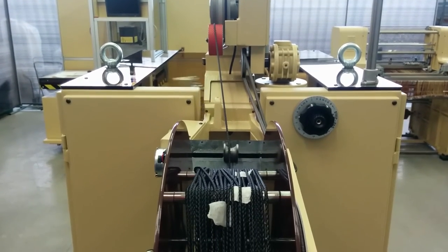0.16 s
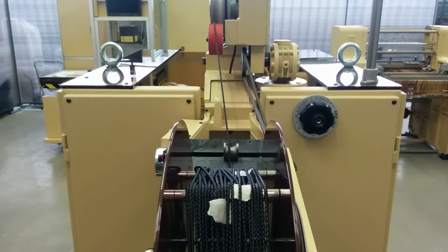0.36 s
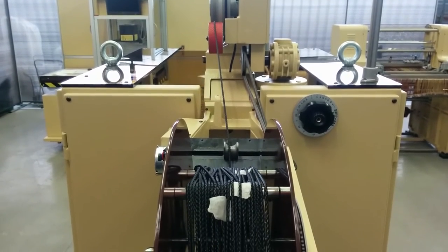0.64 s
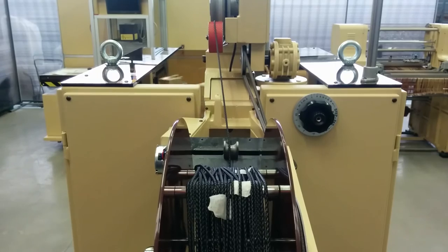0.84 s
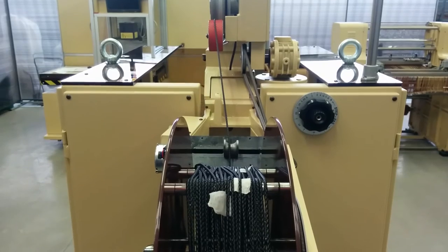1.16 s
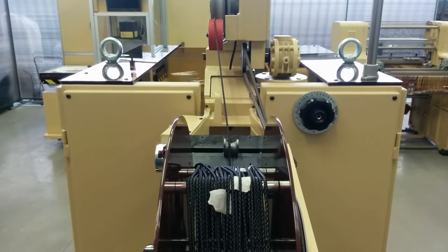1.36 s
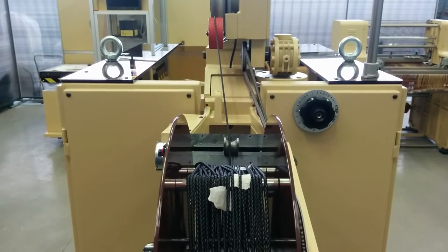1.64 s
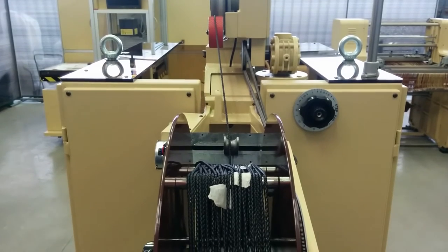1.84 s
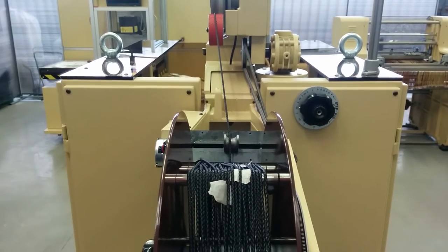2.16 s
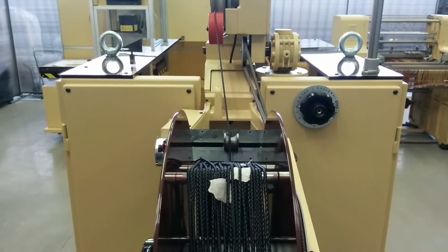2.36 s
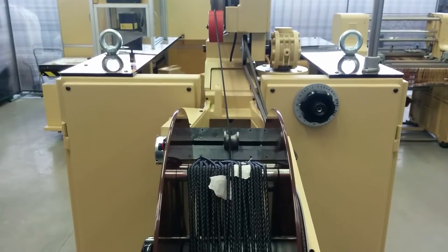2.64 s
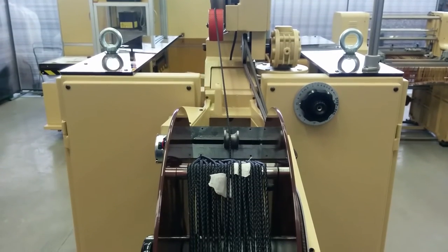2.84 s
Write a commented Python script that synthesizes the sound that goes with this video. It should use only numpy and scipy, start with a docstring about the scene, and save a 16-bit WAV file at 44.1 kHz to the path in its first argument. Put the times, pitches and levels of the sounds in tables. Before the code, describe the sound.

A braiding machine clatters continuously for about 3 seconds, already running at the start and cut off while running. Some twenty uneven hollow knocks per second mix with dry steel clacks, bright tinkles and short plate rings. Accents grow brighter around 0.7-1.3, with strong metallic bursts near 2.2, 2.5 and 2.8. Underneath lie steady low motor rumble, fine loose rattle and faint thin whine; short workshop reverberation.

```python
"""Braiding machine in a workshop

A braiding machine runs: its bobbin carriers knock through the track of a hollow frame, steel levers
clack and tinkle, and jolted plates and spindles ring. Each blow is a force of impulses and noise bursts
filtered by the modes of the struck part, with a longer noise tail as the answer of the hall.
Beneath lie a rattle of decaying sines, the motor's rumble of coloured noise and two thin whining tones."""
import sys
import numpy as np
from scipy.fft import rfft, irfft, next_fast_len
from scipy.io import wavfile
from scipy.ndimage import uniform_filter1d, map_coordinates

SR = 44100
rng = np.random.default_rng(int(sys.argv[2]) if len(sys.argv) > 2 else 0)


def transcribe(u):
    """Save the signal u as a 16-bit wav file named by the first command-line argument.

    u: samples, shape (n,) or (channels, n), limited to [-1, 1]; the rate is SR.
    q: integer samples, one column per channel.
    """
    v = np.clip(np.atleast_2d(u).T, -1, 1)
    q = np.round(v * 32767).astype(np.int16)
    wavfile.write(sys.argv[1], SR, q)


N = 132741  # length [samples]

# time and frequency axes of a single blow
BLOW_SIZE = 24576  # [samples]
AGE = np.arange(BLOW_SIZE) / SR  # [s]
BLOW_HZ = np.fft.rfftfreq(BLOW_SIZE, 1 / SR)


def amp(db):
    """Level as a logarithm of amplitude: decibels to a linear gain."""
    return 10 ** (np.asarray(db) / 20)


def unit(x):
    """Normalisation by effective value: scale to rms 1."""
    return x / np.sqrt(np.mean(x ** 2) + 1e-20)


def along(points, hz):
    """Logarithmic pitch scale: interpolate (frequency [Hz], value) points evenly in log frequency."""
    point_hz, values = np.transpose(points)
    return np.interp(np.log(hz + 1), np.log(point_hz + 1), values)


def filtered(x, response):
    """Linear filtering: convolution in time is multiplication by a response in frequency."""
    size = next_fast_len(N + SR // 2)
    spectrum = rfft(x, size) * response(np.fft.rfftfreq(size, 1 / SR))
    return irfft(spectrum, size)[:N]


def wobble(rate):
    """Band-limited fluctuation: a smooth curve through random knots, rate of them a second."""
    knots = rng.standard_normal(int(N * rate / SR) + 4)
    return map_coordinates(knots, [np.arange(N) * rate / SR])


def motor():
    """Broadband and tonal machine noise: steady coloured rumble and the drive's slightly wavering whine."""
    # whine of the drive: (frequency [Hz], rms level before the waver [dB])
    whine_lines = [(4150, -60), (7950, -59.5)]
    # colour of the rumble: (frequency [Hz], relative level [dB])
    rumble_colour = [(25, -33), (90, 7), (300, 5.5), (450, 4.5), (900, 4.5), (1150, -19.5), (2000, -26),
                     (2600, -30), (4200, -37), (4800, -47), (7900, -49), (15500, -95)]
    rumble_db = -39.5  # rms level
    waver_db, waver_rad, wavers_per_s = 3.5, 1.1, 55  # scale of level and phase wander, knot rate

    t = np.arange(N) / SR
    whine = np.zeros(N)
    for hz, db in whine_lines:
        level = amp(db + waver_db * wobble(wavers_per_s))
        phase = 2 * np.pi * hz * t + waver_rad * wobble(wavers_per_s)
        whine += level * np.sqrt(2) * np.sin(phase)
    rumble = filtered(rng.standard_normal(N), lambda hz: amp(along(rumble_colour, hz)))
    return whine + amp(rumble_db) * unit(rumble)


def add(track, s, sound):
    """Superposition: mix a sound into the track at time s [s]."""
    start = max(round(s * SR), 0)
    track[start:start + len(sound)] += sound[:max(N - start, 0)]


def rattle(tick_t60=0.076, size=4000):
    """Free decay of small oscillators: loose parts tick at random, each ringing briefly at its own pitch."""
    # colour of the whole rattle: (frequency [Hz], relative level [dB])
    rattle_colour = [(250, -4.5), (900, 0.5), (1150, -1), (2600, -0.5), (4000, -30.5)]
    rattle_db, ticks_per_s = -43.5, 220  # rms level of the whole; tick rate
    spread_db = 3  # scale of the exponential spread of tick levels
    low, high = 292.7, 3620  # range of pitches [Hz]

    track = np.zeros(N)
    t = AGE[:size]
    for when, strength, pitch in rng.random((int(ticks_per_s * N / SR), 3)):
        db = -spread_db * np.log(1 - .97 * strength) - 60 * t / tick_t60
        hz = low * (high / low) ** pitch
        add(track, when * N / SR, amp(db) * np.sin(2 * np.pi * hz * t))
    return amp(rattle_db) * unit(filtered(track, lambda hz: amp(along(rattle_colour, hz))))


def colour(points):
    """Minimum phase: folding the cepstrum onto positive time gives a causal response of given colour."""
    cepstrum = irfft(np.log(amp(along(points, BLOW_HZ))))
    cepstrum[1:BLOW_SIZE // 2] *= 2
    cepstrum[BLOW_SIZE // 2 + 1:] = 0
    return np.exp(rfft(cepstrum))


def resonances(modes):
    """Modal superposition: a sum of damped second-order resonators with alternating signs."""
    f = BLOW_HZ
    response = 0
    for k, (centre, width, db) in enumerate(modes):
        damping = 1j * f * width
        response = response + (-1) ** k * amp(db) * damping / (centre * centre - f * f + damping)
    return response


def varied(body):
    """Dependence on the point of impact: from blow to blow the modes shift and change in strength."""
    tint_db, tint_hz = 4, 110.5  # depth and spacing of the random change in colour
    detune = 0.004  # rms relative shift in pitch

    place = BLOW_HZ / tint_hz
    knots = rng.standard_normal(int(place[-1]) + 2)
    tint = colour(np.column_stack([BLOW_HZ, tint_db * map_coordinates(knots, [place])]))
    shifted_hz = BLOW_HZ * (1 + detune * rng.standard_normal())
    return tint * np.interp(shifted_hz, BLOW_HZ, body)


def rebounds(first_s, count=3):
    """Inelastic collision: a hard contact and its weaker rebounds, as impulses at uneven gaps."""
    bounce_s, loss_db = .009, 2.5  # a flight lasts 0.5 to 2 times bounce_s; loss at each rebound
    flights = bounce_s * rng.uniform(.5, 2, count)
    at = (first_s + np.cumsum(flights) - flights[0]) * SR
    return np.bincount(at.astype(int), amp(-loss_db * np.arange(count)), BLOW_SIZE)


def strike(times, levels, body, gain_db, slap_db, attack_s, chatter_t60, hall_db, hall_t60, size=900):
    """Source and filter: hard contacts, a swelling, dying chatter and its hall echo excite one body."""
    lead_s = .003  # the parts graze this long before the nominal time of the blow
    grain_db, flutter_db = 2, 1  # rms unevenness of the contacts and of the echo

    track = np.zeros(N)
    near = amp(-60 * AGE / chatter_t60)
    hall = amp(hall_db - 60 * AGE / hall_t60)
    rise = (1 - np.exp(-AGE / attack_s)) ** 2
    for s, db in zip(times, levels):
        contacts, echo, grain, flutter = rng.standard_normal((4, BLOW_SIZE))
        contacts = contacts * unit(amp(grain_db * unit(uniform_filter1d(grain, size=110))))
        echo = echo * amp(flutter_db * unit(uniform_filter1d(flutter, size=400)))
        chatter = rise * (near * contacts + hall * echo)
        slap = amp(slap_db) * rebounds(lead_s + attack_s * rng.uniform(.5, 1))
        force = chatter / np.linalg.norm(chatter) + slap
        sound = irfft(rfft(force) * varied(body))
        # the level of a blow is that of its loudest short stretch (size samples)
        loudest = np.sqrt(uniform_filter1d(sound ** 2, size).max())
        add(track, s - lead_s, amp(db + gain_db) * sound / loudest)
    return track


def frame():
    """Impact on a hollow body: knocking carriers excite a low thump, a cabinet boom and a deck clop."""
    # carriers knocking the frame, levels before each layer's gain_db:
    # (time [s], thump level [dB], cabinet level [dB], deck level [dB])
    knocks = [(0.001, -42, -27, -42), (0.078, -67, -24.5, -25.5), (0.129, -37, -24, -28.5),
              (0.191, -34.5, -38, -48), (0.235, -42, -31, -25), (0.271, -34.5, -28.5, -35),
              (0.303, -61, -31.0, -50), (0.427, -55, -32.5, -34), (0.458, -59, -30.5, -57),
              (0.542, -34, -38, -31), (0.574, -30, -60, -30), (0.653, -55, -34, -26.5),
              (0.694, -36, -25.5, -28.5), (0.733, -60.5, -32.5, -26.0), (0.782, -37.5, -45, -44),
              (0.849, -37.5, -62.0, -27.5), (0.987, -36, -27.5, -25.5), (1.005, -62.0, -32, -28),
              (1.032, -36, -44, -29.0), (1.135, -65, -23, -25.5), (1.156, -39, -24, -29.0),
              (1.176, -38, -30.5, -28.5), (1.278, -37.5, -26.5, -27.5), (1.3, -55, -36, -23.5),
              (1.336, -44.5, -26, -27.5), (1.437, -64, -34.0, -24), (1.479, -27, -31, -30),
              (1.516, -37, -29.5, -35), (1.59, -32.5, -59.0, -29), (1.622, -38, -32, -28),
              (1.74, -60, -22, -25), (1.778, -40, -22, -24), (1.811, -61, -35, -64),
              (1.855, -57, -62.0, -25.5), (1.898, -44, -29, -27), (1.931, -38, -37, -25.5),
              (1.963, -45, -31, -29.5), (2.046, -44.0, -25.5, -31.5), (2.083, -53, -29, -60),
              (2.176, -55, -27, -31), (2.216, -45, -25.5, -32.5), (2.239, -34, -29.5, -32.5),
              (2.341, -59, -27, -30.5), (2.375, -31.5, -28, -27.5), (2.442, -45, -50, -26),
              (2.486, -60, -24, -26.5), (2.511, -36.5, -20.5, -25.5), (2.533, -34, -21.5, -23.5),
              (2.63, -37.5, -62.0, -30.5), (2.654, -31, -26.5, -27), (2.68, -28.5, -33, -34.5),
              (2.714, -62.0, -33.5, -34.5), (2.783, -39.0, -40, -29.5), (2.824, -45, -35.5, -38.0),
              (2.842, -52, -51, -33.5), (2.916, -40, -29, -51), (2.94, -62.0, -27, -29.5),
              (2.975, -33.5, -46, -23.5)]
    # modes of the thump and of the cabinet: (frequency [Hz], width [Hz], relative level [dB])
    thump_modes = [(82, 46, -13), (139.4, 13.5, -3.5), (163, 15.2, 2)]
    cabinet_modes = [(235, 26, -11.5), (267.8, 32.3, 2), (318, 16, 5.5), (368.5, 8.3, -1)]
    # colour of the deck's crowded, short-lived modes: (frequency [Hz], relative level [dB])
    deck_colour = [(300, -36), (410, -13.5), (450, 5.5), (480, -16), (520, 4.5), (560, -2), (660, -0.5),
                   (730, 2.5), (840, 1.5), (930, 7), (1010, -7), (1150, -18), (1700, -18.5), (2600, -28),
                   (5000, -52.5)]

    s, thump_db, cabinet_db, deck_db = np.transpose(knocks)
    thump_body = resonances(thump_modes) * colour([(40, -19), (90, 1.5), (200, 3.5), (500, -31.5)])
    thump = strike(s, thump_db, thump_body, gain_db=-.5, slap_db=1.5, attack_s=0.00092,
                   chatter_t60=0.056, hall_db=-23.5, hall_t60=0.37)
    boom = strike(s, cabinet_db, resonances(cabinet_modes), gain_db=-1, slap_db=1.0, attack_s=0.00189,
                  chatter_t60=0.033, hall_db=-19.0, hall_t60=0.49)
    clop = strike(s, deck_db, colour(deck_colour), gain_db=-0.25, slap_db=-7, attack_s=0.006864,
                  chatter_t60=0.092, hall_db=-20, hall_t60=0.54)
    return thump + boom + clop


def levers():
    """Impact of stiff steel: levers snap against their stops and ring in three clusters of modes."""
    # steel levers clacking, levels before each layer's gain_db: (time [s], clack level [dB],
    # crack level [dB], low ring level [dB], middle ring level [dB], high ring level [dB])
    clacks = [(0.001, -49, -40.5, -47, -49, -52), (0.047, -49, -65, -67, -68, -64),
              (0.065, -36, -31, -37.5, -45, -42), (0.09, -51, -40, -57, -37, -59),
              (0.132, -33, -34.5, -37, -32, -39), (0.233, -36, -56, -62, -62, -62),
              (0.244, -42, -37.5, -65, -39, -30.5), (0.307, -47, -43, -56, -48, -43),
              (0.395, -40, -45.5, -60, -42, -39), (0.442, -41.5, -66, -54, -54, -41),
              (0.543, -36.5, -74, -78, -81, -102), (0.58, -60, -44.5, -43, -52, -65),
              (0.634, -38, -46.5, -41.5, -65, -75), (0.69, -31, -32, -55, -42, -54),
              (0.704, -42, -48, -30.5, -54, -51), (0.732, -28.5, -31.5, -27, -31.5, -37),
              (0.758, -50, -53, -62, -55, -60), (0.846, -42.5, -34, -57, -23.5, -40),
              (0.93, -33.5, -36, -38, -51, -55), (0.941, -36, -28.5, -28.5, -32, -50),
              (1.003, -31.5, -32.5, -29.5, -26.5, -34), (1.031, -33.5, -28.5, -27.5, -51, -52),
              (1.136, -39, -38.5, -62, -56, -39.5), (1.239, -38, -45, -28, -39, -38),
              (1.26, -34.5, -31.5, -41, -43, -46), (1.283, -38, -36, -33, -33, -42),
              (1.321, -27.5, -29.5, -23, -35, -42), (1.451, -46, -35, -61, -24.5, -41),
              (1.482, -41, -34.5, -37, -35.5, -39), (1.522, -56, -36, -54, -42, -60),
              (1.597, -43.5, -39, -47, -35, -24), (1.631, -38.5, -36.5, -46, -44, -52),
              (1.739, -58, -38.5, -63, -38.5, -56), (1.848, -42, -52, -54, -73, -70),
              (1.929, -39, -33.5, -34.5, -33.5, -65), (2.032, -45.5, -63, -64, -66, -66),
              (2.046, -51, -35.5, -64, -29, -25), (2.129, -40.5, -32.5, -79, -47, -41),
              (2.197, -35, -31, -19, -23.5, -27), (2.22, -38.5, -40, -53, -44, -48),
              (2.325, -46, -36, -70, -52, -42), (2.429, -27.5, -29.5, -31, -31, -31),
              (2.486, -27.5, -31, -32, -31.5, -45), (2.512, -25, -36, -19, -26, -37),
              (2.539, -30, -33.5, -24, -31.5, -43), (2.645, -38.5, -34, -42, -28, -30),
              (2.686, -39, -34, -44, -60, -42), (2.728, -32.5, -41, -36, -36, -44),
              (2.776, -28, -27, -18, -16.5, -24.5), (2.797, -32, -41, -26, -43, -34),
              (2.832, -32.5, -27.5, -20, -27.5, -32), (2.938, -37.5, -35.5, -56, -53, -60)]
    # colours of the crowded, short-lived modes: (frequency [Hz], relative level [dB])
    clack_colour = [(600, -8), (1200, -2), (1750, 6.5), (2050, 5), (2850, 4.5), (3250, -3.5), (3900, -5.5),
                    (4900, -21.5), (8000, -17.5)]
    crack_colour = [(2500, -11.5), (4500, -5), (5600, -15.5), (6000, -2), (8200, 9), (9200, 0), (10400, 2),
                    (10900, -2.5), (13200, -7.5), (13900, -13), (15800, -12.5)]
    # ringing modes of the levers: (frequency [Hz], width [Hz], relative level [dB])
    low_modes = [(6118, 81, -1.5), (6220, 120, -2.5), (6427, 560, -5)]
    middle_modes = [(9470, 91, -5), (9580, 107, -4.5), (10200, 220, -15)]
    high_modes = [(12900, 310, 1.5), (12960, 38, 9)]

    s, clack_db, crack_db, low_db, middle_db, high_db = np.transpose(clacks)
    clack = strike(s, clack_db, colour(clack_colour), gain_db=0.5, slap_db=-8.5, attack_s=0.0089,
                   chatter_t60=0.049, hall_db=-20.5, hall_t60=0.34)
    crack = strike(s, crack_db, colour(crack_colour), gain_db=-1.0, slap_db=-9.5, attack_s=0.0075,
                   chatter_t60=0.027, hall_db=-26, hall_t60=0.54)
    low = strike(s, low_db, resonances(low_modes), gain_db=-2.5, slap_db=-9.5, attack_s=0.0038,
                 chatter_t60=0.035, hall_db=-25.5, hall_t60=0.49)
    middle = strike(s, middle_db, resonances(middle_modes), gain_db=-0.5, slap_db=-9, attack_s=0.0057,
                    chatter_t60=0.044, hall_db=-24.0, hall_t60=0.44)
    high = strike(s, high_db, resonances(high_modes), gain_db=0.5, slap_db=-10, attack_s=0.0042,
                  chatter_t60=0.024, hall_db=-23.5, hall_t60=0.22)
    return clack + crack + low + middle + high


def ringing():
    """Resonance of lightly damped parts: jolted plates, spindles and rods ring at their own modes."""
    # jolts, levels before each layer's gain_db:
    # (time [s], plate level [dB], spindle level [dB], rod level [dB])
    jolts = [(0.012, -49, -39.5, -57), (0.071, -28, -34.5, -63), (0.129, -23.5, -35.5, -67),
             (0.154, -28, -37.5, -62.0), (0.231, -36.5, -31, -61.0), (0.58, -39, -33, -59),
             (0.671, -58, -36, -55), (0.712, -72, -26, -62.0), (0.767, -45, -34.5, -64),
             (0.856, -66, -35.5, -48.5), (0.938, -35.5, -32, -40.5), (0.991, -28.5, -39, -46),
             (1.027, -27.5, -29.5, -57), (1.158, -42, -38.5, -59), (1.201, -37, -33.0, -62.0),
             (1.299, -33.5, -31.5, -41.5), (1.338, -64, -24, -45), (1.392, -62.0, -27.0, -61),
             (1.516, -32.5, -62.0, -69), (1.568, -31, -27.0, -64), (1.59, -29.5, -50, -62.0),
             (1.633, -33, -31, -59), (1.664, -44, -56, -47.5), (1.877, -47, -36.0, -69),
             (1.939, -55, -28.5, -65), (2.196, -42, -37.5, -63), (2.388, -41.5, -35, -68),
             (2.447, -28, -47, -49), (2.522, -28, -23, -37.5), (2.56, -28.5, -60, -50),
             (2.643, -35, -41, -58), (2.739, -26, -20.5, -45.5), (2.777, -27.5, -21, -37),
             (2.796, -36.5, -20.5, -34.0), (2.819, -55, -26, -36.5), (2.909, -42, -31, -50)]
    # modes of each part: (frequency [Hz], width [Hz], relative level [dB])
    plate_modes = [(1360.7, 7.8, 3.5), (1421.7, 14, 9.5), (1450, 400, -17.5)]
    spindle_modes = [(1785, 190, -17), (1895.5, 33.3, 7.5), (1920, 40, 6), (2164.4, 15.4, -1.5)]
    rod_modes = [(4184, 39, 2.5), (4264, 14, -8.5)]

    s, plate_db, spindle_db, rod_db = np.transpose(jolts)
    plate = strike(s, plate_db, resonances(plate_modes), gain_db=0.5, slap_db=-2.5, attack_s=0.001187,
                   chatter_t60=0.04, hall_db=-11.5, hall_t60=0.47)
    spindle = strike(s, spindle_db, resonances(spindle_modes), gain_db=-0.5, slap_db=-5.5,
                     attack_s=0.002086, chatter_t60=0.029, hall_db=-19.5, hall_t60=0.44)
    rod = strike(s, rod_db, resonances(rod_modes), gain_db=3.5, slap_db=2.5, attack_s=.0011,
                 chatter_t60=0.039, hall_db=-16, hall_t60=0.35)
    return plate + spindle + rod


def scene():
    """Superposition of sources: the sounds of the whole machine add linearly in one channel."""
    return (motor() + rattle() + frame() + levers() + ringing())[None]


def record(dry):
    """Band limitation: an ideal low-pass removes everything from its cutoff upward."""
    top_hz = 15850
    return filtered(dry[0], lambda hz: hz < top_hz)[None]


dry = scene()
out = record(dry)
transcribe(out)
```